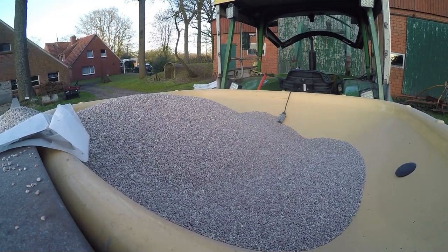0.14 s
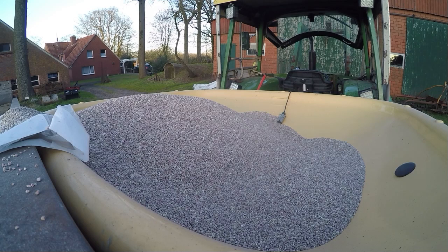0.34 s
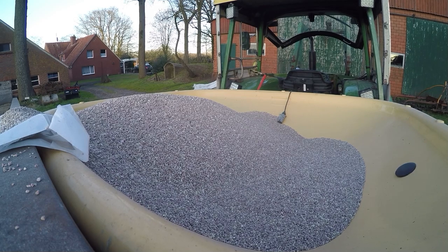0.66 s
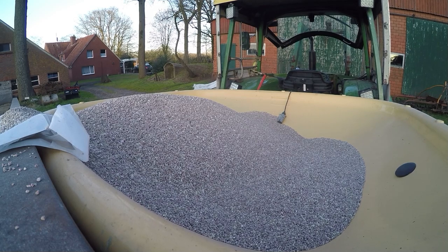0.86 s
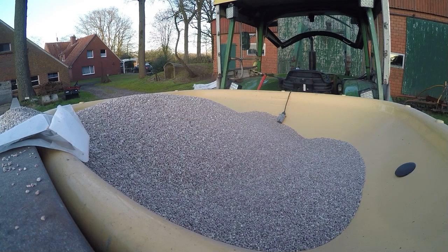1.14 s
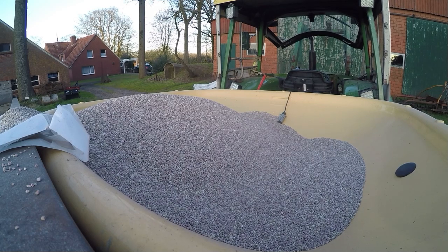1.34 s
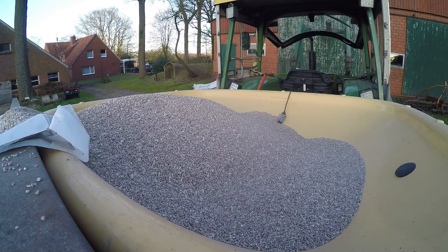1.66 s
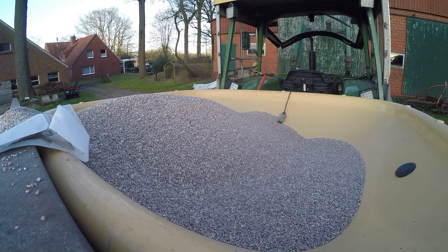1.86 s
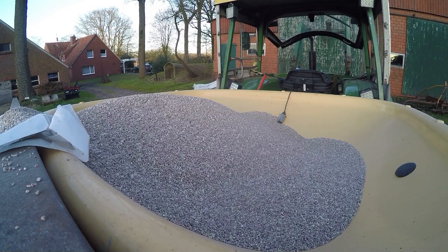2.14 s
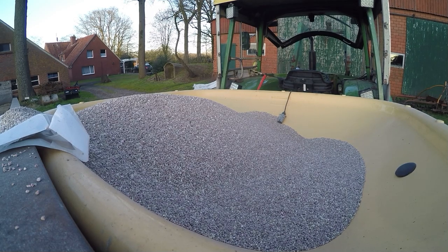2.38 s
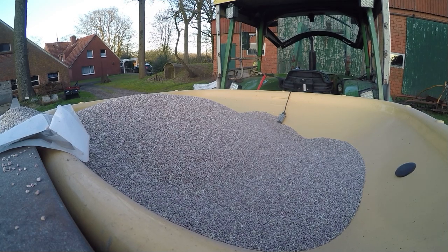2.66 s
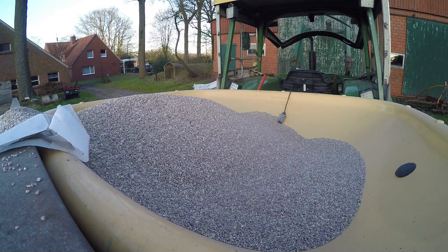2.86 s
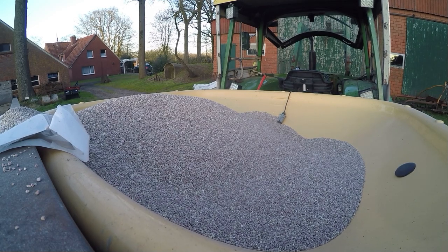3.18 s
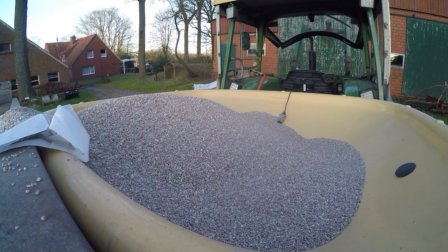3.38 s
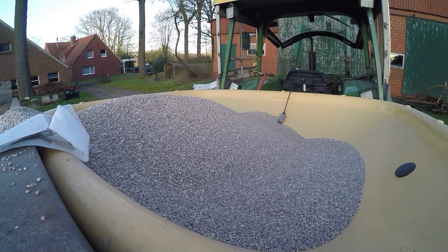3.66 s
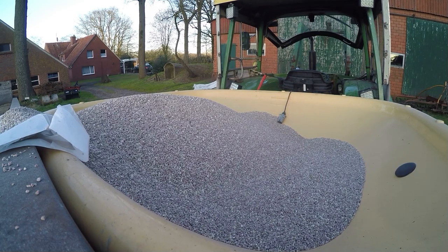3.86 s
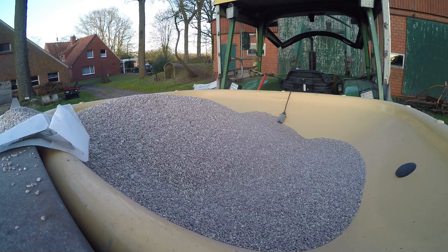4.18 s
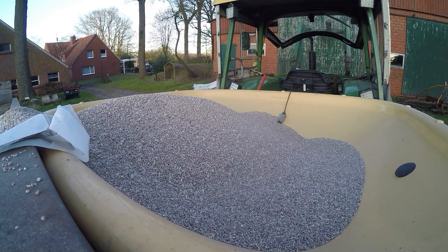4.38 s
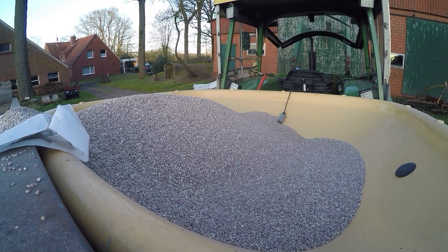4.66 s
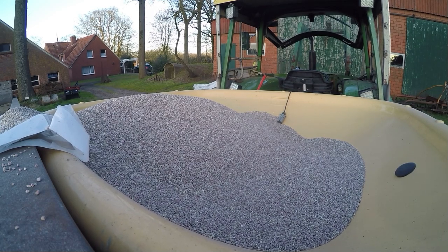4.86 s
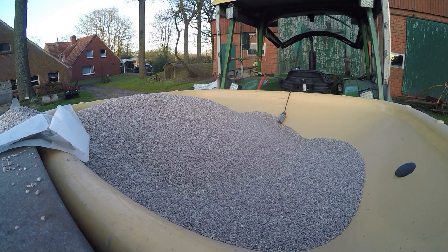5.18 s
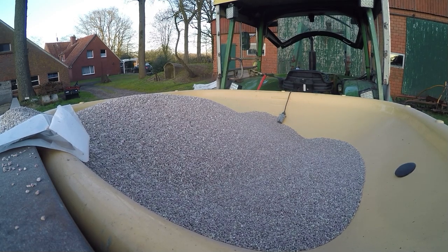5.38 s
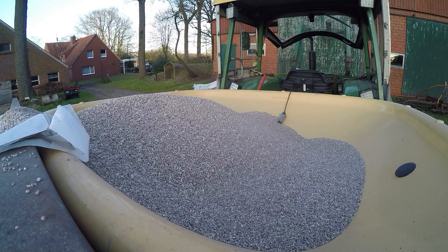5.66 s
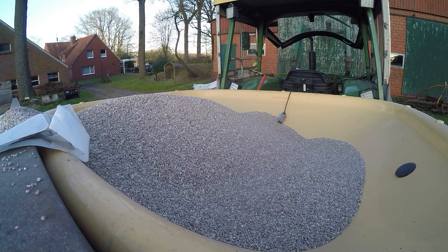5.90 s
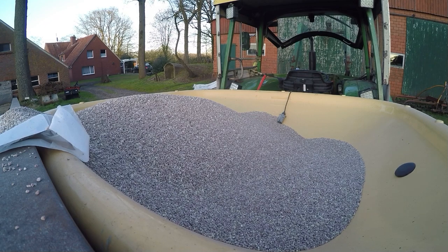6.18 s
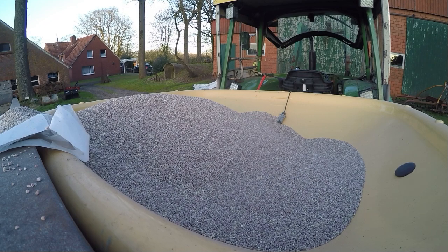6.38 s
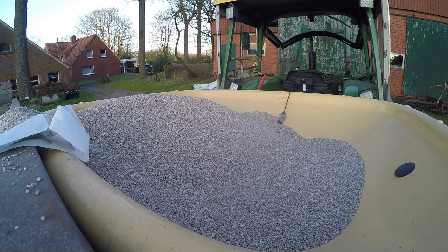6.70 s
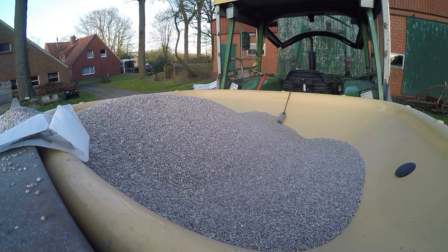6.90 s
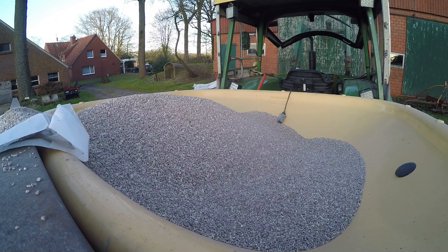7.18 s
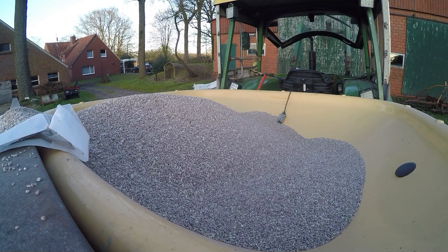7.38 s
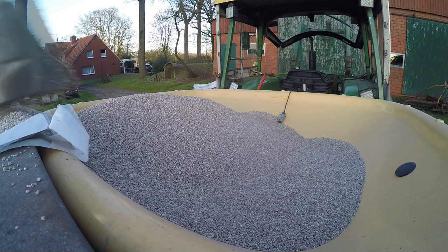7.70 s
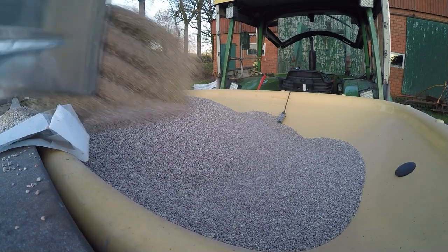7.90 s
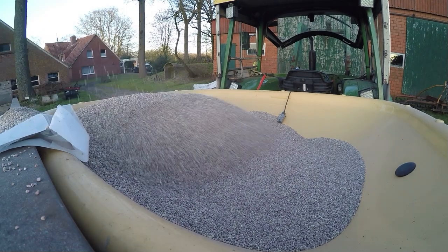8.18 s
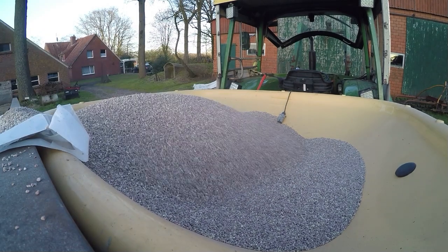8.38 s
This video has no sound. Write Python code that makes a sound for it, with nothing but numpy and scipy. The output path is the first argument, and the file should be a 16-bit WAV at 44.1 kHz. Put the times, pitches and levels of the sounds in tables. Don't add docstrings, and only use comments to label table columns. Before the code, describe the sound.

A metal shovel clanks and crunches hard into a heap of granules again and again, then loads drum and hiss into a plastic hopper.

```python
import sys
import numpy as np
from scipy import signal
from scipy.io import wavfile
from scipy.ndimage import uniform_filter1d

SR = 44100
rng = np.random.default_rng(int(sys.argv[2]) if len(sys.argv) > 2 else 0)


def convert_level_to_amplitude(level_db):
    exponent = np.asarray(level_db, float) / 20
    return 10 ** exponent


def int16_out(signal):
    q = np.round(np.clip(np.atleast_2d(signal).T, -1, 1) * 32767)
    wavfile.write(sys.argv[1], SR, q.astype(np.int16))


N = 377010
TIME_S = np.arange(N) / SR
STEP = 44


def from_db(db):
    return np.exp(db * (np.log(10) / 20))


def per_sample(coarse):
    return np.interp(np.arange(N) / STEP, np.arange(len(coarse)), coarse)


def together(*levels_db):
    return 10 * np.log10(sum(convert_level_to_amplitude(db) ** 2 for db in levels_db))


def swell(s, db, held_s, rise_db_s, fall_db_s):
    t = np.arange(0, N + STEP, STEP)[:, None] / SR
    below_db = rise_db_s * np.maximum(s - t, 0)
    fallen_db = fall_db_s * np.maximum(t - s - held_s, 0)
    each_db = db - below_db * (1 + below_db / 80) - fallen_db
    return 10 * np.log10(np.sum(convert_level_to_amplitude(np.maximum(each_db, -200)) ** 2, axis=1))


def rms_one(x):
    return x / np.sqrt(np.mean(x ** 2) + 1e-20)


def drift(rate_hz):
    r = np.exp(-64 * np.pi * rate_hz / SR)
    noise = rng.standard_normal(N // 32 + 502)
    slow = signal.lfilter([1], [1, -2 * r, r * r], noise)[500:]
    return np.interp(np.arange(N) / 32, np.arange(len(slow)), rms_one(slow))


def strikes(times_s, db):
    clicks = np.zeros(N)
    clicks[np.round(np.asarray(times_s) * SR).astype(int)] = convert_level_to_amplitude(db)
    return clicks


def ring(clicks, hz, t60_s):
    r, w = convert_level_to_amplitude(-60 / (t60_s * SR)), 2 * np.pi * hz / SR
    return signal.lfilter([0, np.sin(w)], [1, -2 * r * np.cos(w), r * r], clicks + 1e-18)


def resonance(x, hz, width_hz):
    r = np.exp(-np.pi * width_hz / SR)
    zeros = np.sqrt((1 - r * r) / 2) * np.array([1, 0, -1])
    return signal.lfilter(zeros, [1, -2 * r * np.cos(2 * np.pi * hz / SR), r * r], x)


def grains(spectrum, per_s, spread_db, clump_db, patchy_db):
    hz_points, db_points = np.transpose(spectrum)
    sizes = convert_level_to_amplitude(spread_db * np.minimum(rng.exponential(1, (2, N)), 5)) * rng.choice([-1, 1], (2, N))
    clicks = sizes * (rng.random((2, N)) < per_s / SR) * convert_level_to_amplitude(clump_db * drift(55.0))
    octaves = np.log2(hz_points[-1] / hz_points[0])
    edges = np.geomspace(hz_points[0], hz_points[-1], int(2.5 * octaves) + 2)
    edges[-1] = min(1.12 * edges[-1], .49 * SR)
    out = 0
    for k, (low, high) in enumerate(zip(edges, edges[1:])):
        band_pass = signal.butter(2, [low, high], "band", fs=SR, output="sos")
        band = signal.sosfilt(band_pass, clicks[k % 2])
        level_db = np.interp(np.log(low * high) / 2, np.log(hz_points), db_points)
        out = out + band * from_db(level_db + patchy_db * np.roll(drift(26.6), k))
    return rms_one(out)


def build_up(gain):
    r = np.exp(-1 / (0.0011 * SR))
    return signal.lfilter([1 - r], [1, -r], gain)


# start in seconds, crunch in dB, decay in dB/s, loose grit minus crunch in dB.
BITES = [(0.082, -15, 378, -11), (0.157, -18, 311.5, -8), (0.633, -45, 600, -30), (0.726, -43.5, 90, -24.5),
         (0.961, -12, 444, -14.5), (1.145, -33.5, 377, -40), (1.209, -20.5, 86, -31),
         (1.21, -33.5, 900, 5.5), (1.268, -32.5, 600, -1.5), (2.208, -18.5, 384, -11.5),
         (2.315, -32.5, 186, -2), (2.546, -34, 153, -10), (3.201, -35, 248.5, -23), (3.403, -40, 600, -26),
         (4.145, -27, 562, -29), (4.219, -9.5, 749, -61), (4.994, -7.5, 628, -14), (5.746, -15, 208, -11.5),
         (5.826, -15, 151, -7), (7.393, -53.5, 97, 9)]
# full at in seconds, crunch in dB, held in seconds, rise in dB/s, fall in dB/s.
PUSHES = [(.0, -52, .03, 500, 150), (0.158, -21, 0.25, 3000, 567), (1.205, -40.5, .004, 450, 300),
          (1.328, -22.5, 0.092, 3000, 86), (1.55, -18.5, 0.13, 78, 703), (2.538, -32, 0.024, 80, 100),
          (2.743, -15, 0.18084, 102, 246), (3.19, -47, 0.0036, 63, 24), (4.134, -48, .01, 101, 300),
          (4.324, -35.5, .01, 172.5, 306), (4.351, -13, 0.17, 903.5, 491.5), (5.09, -13, 0.19, 508, 377.5),
          (5.939, -14, 0.1, 199, 189), (6.097, -22, 0.0082, 69, 424), (6.37, -33, 0.03815, 231, 240),
          (6.698, -50, 0.2, 39, 15)]
# full at in seconds, patter in dB, held in seconds, rise in dB/s, fall in dB/s.
SPILLS = [
    (.45, -34, 0.006, 277, 157),
    (1.055, -53, 0.0061, 74, 500),
    (1.735, -36, 0.066, 300, 105.5),
    (1.935, -43.5, 0.00334, 31, 451.5),
    (3.366, -52, 0.0292, 43, 98.5),
    (3.674, -28, 0.0064, 51, 178),
    (4.58, -29, 0.0026, 190, 212),
    (6.368, -28.5, 0.0065, 238, 214),
]


def effort():
    s, db, fall_db_s, grit_db = np.transpose(BITES)
    push_s, push_db, held_s, rise_db_s, push_fall_db_s = np.transpose(PUSHES)
    bite_hold_s, bite_rise_db_s, rest_db = 0.004, 6998, -67
    spill_db = swell(*np.transpose(SPILLS))
    bite_db = swell(s, db, bite_hold_s, bite_rise_db_s, fall_db_s)
    crunch_db = together(bite_db, swell(*np.transpose(PUSHES)), spill_db - 15.5, rest_db)
    thrown_db = swell(push_s, push_db - 8.5, held_s, rise_db_s, np.minimum(push_fall_db_s, 181))
    loose_db = together(thrown_db, spill_db, rest_db)
    patter_db = together(swell(s, db + grit_db, bite_hold_s, bite_rise_db_s, fall_db_s), loose_db)
    airy_db = 2 * loose_db - patter_db - crunch_db
    return per_sample(crunch_db), per_sample(patter_db - crunch_db), per_sample(airy_db)


# start in seconds, extra level in dB.
JOLTS = [(0.095, 7.5), (0.244, 4), (.262, 8.5), (0.359, 8.5), (0.387, 4), (.755, 2), (1.245, 4),
         (1.267, 1.5), (1.365, -4), (1.396, 8.5), (1.55, 4.5), (1.653, 3), (1.692, 8.5), (2.457, 9.5),
         (2.503, 0), (2.545, 11.5), (2.742, 4.5), (4.301, 8.5), (4.348, 1), (5.172, 3), (5.24, 0),
         (6.67, 10)]
# frequency in Hz, density in dB per Hz.
CRUNCH = [(110, -24), (180, -4.5), (645, -2.5), (704, -2.5), (973, -0.5), (1160, -0.5), (2680, -11.5),
          (3750, -21.5), (6000, -36.5), (7800, -23), (13200, -120)]
# frequency in Hz, density in dB per Hz.
PATTER = [(880, -12), (1500, -12), (2440, -8.5), (2670, -8.5), (3750, -8.5), (4890, -8), (10700, -23.5),
          (15400, -34)]
# full at in seconds, level in dB, held in seconds, rise in dB/s, fall in dB/s.
DUST = [
    (3.74, -40.5, .02, 60.5, 80),
]
# frequency in Hz, width in Hz, level in dB.
LOADED_BLADE = [(225.6, 13, -5), (305, 18, -12.5), (427, 17, -7), (636, 6, -14.5), (756, 24, -14.5),
                (969, 90, -12.5), (1100, 8.38, -41), (1253, 36, -15.5), (1640, 14, -11), (1770, 8.2, -16.5),
                (2200, 130, -12.5), (2716, 120, -9), (2940, 93, -10), (3310, 110, -6), (4037, 77.7, -2.5),
                (4830, 45, -8.5), (5880, 240, -5)]


def shovel():
    crunch_db, patter_db, airy_db = effort()
    s, jolt_db = np.transpose(JOLTS)
    slips = strikes(s, 0) * np.interp(TIME_S, s, jolt_db)
    slip_s = .014
    jolts_db = signal.lfilter([1], [1, -np.exp(-1 / (slip_s * SR))], slips)
    force = convert_level_to_amplitude(crunch_db + jolts_db)
    crunch = grains(CRUNCH, per_s=2000.0, spread_db=1.5, clump_db=2.0, patchy_db=2.0)
    patter = grains(PATTER, per_s=7500.0, spread_db=2.0, clump_db=1.0, patchy_db=2.0)
    fine = signal.sosfilt(signal.butter(2, 8000, "high", fs=SR, output="sos"), patter)
    dull = signal.lfilter([.6], [1, -.4], patter)
    brightness = np.clip(1.0 + airy_db / 22, .15, 1)
    sparkle = fine * convert_level_to_amplitude(0.56 * np.clip(airy_db, -30, 12) - 18.0)
    patter = dull + (patter - dull) * brightness + sparkle
    loose_force = force * convert_level_to_amplitude(patter_db + 0.089 * jolts_db)
    rubbing = build_up(force) * crunch + build_up(loose_force) * patter
    dust = per_sample(convert_level_to_amplitude(swell(*np.transpose(DUST)))) * fine
    loaded = rubbing * convert_level_to_amplitude(-.6 * np.clip(patter_db + 4.5, 0, 15))
    modes = 0
    for hz, width_hz, db in LOADED_BLADE:
        spot_db = 3.3 * drift(7)
        modes = modes + resonance(loaded * from_db(db + spot_db - 22.5), hz, width_hz)
    return 0.67 * rubbing + modes + dust


# start in seconds, clank peak in dB, low pitch in Hz, high pitch in Hz, high cluster in dB.
KNOCKS = [(0.085, -3, 507, 1890, -36), (0.163, -5.5, 401, 1714, -13.5), (0.616, -22, 454, 1843, -46),
          (0.7, -15.5, 237, 2650, -51), (0.962, -5.5, 294.4, 1570, -32), (1.144, -39, 213, 1740, -53),
          (1.213, -14, 1005, 1640, -24), (1.331, -6, 212, 1480, -23), (2.208, -20, 394.9, 1570, -43.5),
          (2.314, -19.5, 248, 1450, -49.5), (2.548, -10.5, 320, 1640, -28), (3.202, -40, 820, 2047, -33),
          (3.395, -29, 452, 1630, -37), (4.146, -24, 288, 1530, -46), (4.221, -8, 433, 2880, -44.5),
          (4.995, -4, 928, 1522, -12), (5.75, -8, 949, 3372, -5), (5.833, -13, 1050, 2500, -11.5)]


def knocks():
    s, clank_db, low_hz, high_hz, high_db = np.transpose(KNOCKS)
    out, t = np.zeros(N), np.arange(4000) / SR
    grit = rng.standard_normal((len(s), len(t)))
    bursts = grit * t / 0.0028 * np.exp(1 - t / 0.0018)
    for k, at in enumerate(np.round((s - .003) * SR).astype(int)):
        cluster = 0
        for ratio, share in [(1, 1), (1.44, .2), (1.74, .15)]:
            cluster = cluster + share * np.sin(2 * np.pi * ratio * high_hz[k] * t)
        cluster *= 0.74 + 3.09 * uniform_filter1d(grit[k], size=40)
        cluster *= (1 - np.exp(-t / 0.0037)) * convert_level_to_amplitude(high_db[k] + 3 - 60 * t / 0.071)
        low_shape = (1 - np.exp(-t / 0.0029)) * convert_level_to_amplitude(5.0 - 60 * t / 0.14)
        low = np.sin(2 * np.pi * low_hz[k] * t) * low_shape
        clank = 0.084 * signal.lfilter([.4], [1, -.6], bursts[k]) + low
        out[at:at + len(t)] += convert_level_to_amplitude(clank_db[k] - 14.5) * clank + cluster
    out = signal.sosfilt(signal.butter(2, 7000, fs=SR, output="sos"), out)
    push = strikes(s, clank_db - 21.5)
    floor = ring(push, 56.3, 0.97) + 1.6 * ring(push, 130.0, 0.16) + 0.49 * ring(push, 250, 0.071)
    return out + floor


# middle
# in seconds, length in seconds, pitch in Hz, level in dB.
SINGS = [(0.095, 0.029, 520.1, -41), (0.183, 0.046, 445, -30), (0.262, 0.05254, 433.7, -22.5),
         (0.375, 0.042, 1056, -21), (0.395, 0.036, 692, -27), (0.976, 0.022, 297.2, -16),
         (1.414, 0.03, 969, -24), (1.542, 0.042, 953, -23.5), (1.632, 0.085, 929, -26.5),
         (1.634, 0.02284, 1654, -24), (1.669, 0.055, 1135, -20), (1.695, 0.03, 308, -20),
         (1.698, 0.033, 695, -19), (2.556, 0.026, 328, -26.5), (2.751, 0.032, 1670, -25),
         (2.779, 0.086, 985.1, -19), (2.875, 0.12, 1048, -23.5), (2.887, 0.1, 387.4, -25),
         (2.93, 0.036, 1292, -26), (4.223, 0.018, 1280, -21.5), (4.35, 0.014, 997, -14.5),
         (4.395, 0.022, 1820, -21), (4.397, 0.088, 410, -23), (4.471, 0.11, 908, -22),
         (4.48, 0.08, 1656, -32), (4.483, 0.03296, 1035, -17), (5.002, 0.017, 919, -19),
         (5.004, 0.021, 325, -14), (5.105, 0.04733, 1523, -22), (5.127, 0.103, 303.5, -23),
         (5.129, 0.0534, 1840, -20.5), (5.138, 0.057, 1055, -25), (5.188, 0.075, 947, -20.5),
         (5.245, 0.072, 1680, -30), (5.26, 0.039, 1012, -18.5), (5.761, 0.028, 1220, -20),
         (5.763, 0.02633, 938, -25), (5.764, 0.033, 284, -23.5), (5.852, 0.04105, 1038, -24.5),
         (5.936, 0.054, 1206, -24), (5.963, 0.044, 297, -20.5), (5.968, 0.13415, 1028, -22.5),
         (6.019, 0.057, 1335, -21.5), (6.027, 0.045, 969, -17.5), (6.028, 0.135, 1002, -20.5),
         (0.167, 0.012, 4300, -21.5), (0.169, 0.022, 2261, -25), (0.365, 0.056, 3381, -32),
              (1.408, 0.025, 2261, -29), (1.561, 0.027, 3056, -24.5), (1.67, 0.024, 2821, -25),
              (1.682, 0.052, 2412, -29), (4.46, 0.109, 2750, -29), (4.477, 0.079, 3354, -30),
              (4.479, 0.025, 5943, -30.5), (4.483, 0.028, 2170, -24), (5.109, 0.057, 2490, -29),
              (5.151, 0.055, 5965, -31), (5.156, 0.11, 4802, -30), (5.178, 0.031, 2627, -29),
              (5.277, 0.019, 2800, -40), (5.754, 0.03, 4809, -26), (5.754, 0.01, 5900, -22.5),
              (5.77, .01, 5900, -32), (5.757, 0.022, 3365, -28), (5.759, 0.019, 2132, -22),
              (5.837, 0.027, 2519, -26.5), (6.007, 0.028, 2326, -28), (6.01, 0.024, 4277, -28),
         (0.749, .05, 242.5, -38.5), (1.534, .05, 920, -34), (1.569, .04, 1480, -23.5),
               (1.272, .01, 5800, -34), (5.812, 0.006, 7500, -35), (2.216, .02, 1203, -30),
               (2.225, .04, 304, -29), (2.238, 0.033, 2840, -41), (2.33, .04, 1075, -34.5),
               (2.339, .06, 249.5, -34.5), (2.36, .025, 2330, -41), (2.47, .04, 1002, -35),
               (2.506, .02, 1750, -37), (3.395, .03, 853, -47), (3.41, .03, 610, -46), (4.0, .05, 264, -57),
               (4.239, .026, 239, -22), (4.315, .03, 980, -35)]


def singing():
    out, rows = np.zeros(N), SINGS
    noise = rng.standard_normal((len(rows), 2, 1200))
    grit = uniform_filter1d(noise, size=30, axis=2) * np.sqrt(30)
    blows_s = np.sort([row[0] for row in KNOCKS + JOLTS])
    for (s, length_s, hz, db), (shake, twist) in zip(rows, grit):
        t = np.arange(round(1.7 * length_s * SR)) / SR
        place = t * SR / 10 * (.5 + hz / 2000)
        rough = 1 + .7 * np.interp(place, np.arange(1200), shake + 1j * twist, period=1200)
        at = round((s - t[-1] / 2) * SR)
        since_s = t + at / SR - blows_s[blows_s < s][-1] + (length_s > .055)
        rough *= np.clip(since_s / .003 + .7, 0, 1)
        tone = np.real(rough * np.exp(2j * np.pi * hz * t))
        out[at:at + len(t)] += convert_level_to_amplitude(db) * np.sin(np.pi * t / t[-1]) * tone
    return out


# frequency in Hz, T60 in seconds.
FREE_BLADE = [(452, .67), (684, .36), (762, .4), (924, .3), (1165, .36), (1545, .35), (1669, .4),
              (2083, .4), (2191, .27), (2290, .35), (2710, .3), (3354, .26), (4786, .3)]
# start in seconds, level in dB, favoured pitch in Hz, spread in octaves.
RELEASES = [(.40, -37, 455, 0.98), (0.618, -55, 450, 0.54), (1.70, -30.5, 689.3, 0.87),
            (1.899, -55, 1330, 0.7), (2.211, -32.5, 600, 0.4), (2.225, -43, 762, 0.046),
            (2.321, -47, 900, 2.6), (2.466, -42, 980, 1.9), (2.548, -34, 900, 1.3), (3.55, -45, 684, 0.059),
            (3.581, -45.5, 1170, 0.87), (3.69, -46, 834.4, 0.28), (3.65, -33.5, 1550, 0.065),
            (3.675, -39, 2710, .1), (3.73, -56, 2510, .5), (3.719, -45, 1100, 0.9),
            (3.755, -49.5, 1669, 0.05), (4.533, -42, 450, 0.63)]


def blade_ring():
    s, db, favoured_hz, octaves = np.transpose(RELEASES)
    out = 0
    for hz, t60_s in FREE_BLADE:
        away = np.log2(hz / favoured_hz) / octaves
        out = out + ring(strikes(s, db - 6 * away ** 2), hz, t60_s)
    return out


# landing in seconds, drumming in dB, spray in dB, spray lag in seconds, pouring time in seconds.
LOADS = [
    (7.602, -29, -25, 0.26, 0.32),
    (8.442, -27, -23, 0.0018, 0.021),
]
# frequency in Hz, density in dB per Hz.
DRUMMING = [(88, -29), (150, -10.5), (394, -5), (446, -4), (1130, 0), (1920, -3), (2600, -5.5),
            (10000, -27.5), (13000, -56), (22000, -120)]
# frequency in Hz, density in dB per Hz.
SPRAY = [(1470, -55.5), (2500, -6), (5280, -6), (7380, -12.5), (13500, -13.5), (15400, -17.5)]


def flings():
    s, db, fine_db, lag_s, pour_s = np.transpose(LOADS)
    landing_db_s = 1598
    rise_db_s, held_s = 23.5 / lag_s, 0.32 * pour_s
    drum_db = together(swell(s, db, pour_s, landing_db_s, 120),
                       swell(s, db - 6, pour_s, landing_db_s, 15))
    spray_db = together(swell(s + lag_s, fine_db, held_s, rise_db_s, 198.5),
                        swell(s + lag_s, fine_db - 13, held_s, rise_db_s, 35))
    landed = np.arange(N) >= (s[0] - .005) * SR
    drum = grains(DRUMMING, per_s=3800.0, spread_db=4.0, clump_db=0.85, patchy_db=2.0)
    spray = grains(SPRAY, per_s=10000.0, spread_db=-1.5, clump_db=1.0, patchy_db=-0.5)
    return landed * (per_sample(convert_level_to_amplitude(drum_db)) * drum + per_sample(convert_level_to_amplitude(spray_db)) * spray)


# start in seconds, peak in dB, pitch in Hz, decay in swings.
THUDS = [(3.137, -28, 71.56, 3.8), (4.373, -2.5, 166.3, 1.7), (5.12, -2, 166, 1.9), (5.17, -4, 180, 1.2),
         (6.832, -19, 57.6, 1.3), (6.831, -40, 900, 2), (6.833, -36, 453, 5), (6.927, -26, 125, 1.8),
         (6.929, -23, 47, 1.4), (7.263, -21, 58, 1.9), (7.293, -18.5, 129, 1.8), (7.393, -16, 72, 1.3)]
# full at in seconds, level in dB, held in seconds, rise in dB/s.
SHAKES = [(.086, -32, 0.3, 453), (.706, -26.5, 0.018, 1499.5), (0.977, -13.5, .002, 1100),
          (1.15, -26.5, 0.0047, 2000), (1.223, -50, .01, 228), (1.36, -14.5, .002, 93),
          (1.7, -21.5, .002, 81), (2.207, -23.5, 0.014, 3000), (2.57, -28, .002, 150),
          (2.87, -10, 0.016, 132), (3.41, -42, .002, 310), (3.55, -41.5, 0.0651, 400),
          (4.24, -31, 0.039, 193), (4.402, -10, 0.064, 227), (4.994, -35, 0.026, 3000),
          (5.12, -15, 0.15, 205), (5.9, -22, 0.15, 122), (6.11, -18, 0.00173, 70),
          (6.438, -45.5, 0.0493, 37), (6.823, -39, 0.11, 3000), (7.294, -31, 0.00236, 420),
          (7.408, -33.5, .002, 454), (7.846, -38.5, 0.095, 55), (8.206, -41, .002, 110),
          (8.55, -47, .01, 56)]
# frequency in Hz, density in dB per Hz.
RUMBLE = [(13, -47), (22, -4), (48, 1.5), (144, 3), (304, -6), (347, -10.5), (462, -13), (500, -2),
          (650, -35), (1100, -120)]


def trailer_floor():
    out, t = np.zeros(N), np.arange(6000) / SR
    for s, db, hz, swings in THUDS:
        at = round(s * SR)
        thud = convert_level_to_amplitude(db - 1.5) * np.sin(2 * np.pi * hz * t) * np.exp(-t * hz / swings)
        sole_slap = convert_level_to_amplitude(db - 15.5) * np.sin(2 * np.pi * 3.6 * hz * t) * np.exp(-t / 0.0074)
        out[at:at + len(t)] += thud + sole_slap
    rumble = grains(RUMBLE, per_s=600.0, spread_db=2.0, clump_db=4.5, patchy_db=4.0)
    shake_db = swell(*np.transpose(SHAKES), fall_db_s=164)
    return out + per_sample(convert_level_to_amplitude(shake_db - 4.5)) * rumble


# start in seconds, peak in dB, pitch in Hz.
TICKS = [(0.0293, -32, 1811), (0.0938, -24, 7000), (.111, -26, 9000), (.599, -40, 3000), (.7442, -41, 6000),
         (0.756, -34, 2610), (0.8175, -39, 2440), (.825, -39, 5000), (.841, -42, 5000), (0.853, -39, 2500),
         (.8585, -31, 4000), (.876, -39, 5000), (.9015, -43, 3020), (.9235, -41, 2260), (.929, -42, 3000),
         (2.11, -41, 3390), (2.1422, -31, 4030), (2.1594, -39, 4500), (3.8021, -22, 4800),
         (3.932, -40, 3500), (3.9785, -35, 5100), (3.996, -42, 5000), (4.0635, -36, 3530),
         (4.905, -39, 2480), (5.6936, -47, 2500), (6.755, -42, 3500), (6.906, -30, 4746),
         (7.074, -34, 3500), (7.1386, -33, 2944), (7.16, -36, 3000), (7.439, -33, 3270),
         (7.5183, -38, 4600), (7.668, -14, 4020), (7.711, -24, 4500), (8.0164, -20, 6000),
         (8.196, -39, 2500), (8.26, -25, 2400), (8.284, -23, 6440), (8.319, -27.5, 2940),
         (8.345, -43, 4000), (8.371, -27, 2513), (8.389, -26, 6000)]
# time in seconds, level in dB.
SETTLING = [
    [(.55, -97), (.8, -57.5), (.95, -89.5), (6.5, -74), (6.7, -57), (7.55, -65), (8.0, -62), (8.4, -47.5),
     (8.55, -30.5)],
]


def ticks():
    out, t = np.zeros(N), np.arange(400) / SR
    for s, db, hz in TICKS:
        at = round(s * SR)
        shape = np.exp(-t * hz / 0.89) * (1 - np.exp(-t * hz / 0.25))
        out[at:at + len(t)] += convert_level_to_amplitude(db + 8.5) * np.sin(2 * np.pi * hz * t) * shape
    spectrum = [(1200, -6), (4000, -1.5), (10000, -14)]   # Hz, dB per Hz
    settling = grains(spectrum, per_s=250, spread_db=3, clump_db=3, patchy_db=3)
    return out + convert_level_to_amplitude(np.interp(TIME_S, *np.transpose(SETTLING[0]))) * settling


def walls(x):
    t, t60_s = np.arange(round(.4 * SR)) / SR, 0.6429
    tail = rng.standard_normal(len(t)) * convert_level_to_amplitude(-60 * t / t60_s) * np.clip((t - .02) / 0.0065, 0, 1)
    tail = signal.lfilter([.4], [1, -.6], tail)
    return signal.fftconvolve(x, tail / np.sqrt(np.sum(tail ** 2)))[:N]


def whistle(s, length_s, hz, db, flutter):
    out, at, t = np.zeros(N), round(s * SR), np.linspace(0, length_s, len(hz))
    shake = flutter[at:at + len(t)]
    gate = np.clip(np.minimum(t, length_s - t) / 0.0055, 0, 1)
    phase = 2 * np.pi * np.cumsum(hz * (1 + 0.0044 * shake)) / SR
    out[at:at + len(t)] = np.sqrt(2) * gate * convert_level_to_amplitude(db + 2.9 * shake) * np.sin(phase)
    return out


# start in seconds, length in seconds, top in Hz, level in dB, loudest point as share of length.
CALLS_UP = [
    (6.674, 0.15, 3340, -56, 0.5407),
    (6.993, 0.15, 3100, -53.5, 0.42),
    (7.313, 0.17, 3230, -55, 0.35),
]
# start in seconds, length in seconds, from in Hz, to in Hz, level in dB.
CHIRPS = [
    (3.93, 0.037, 3900, 3000, -59.5),
    (4.07, .02, 3284, 3880, -57),
    (4.102, 0.0275, 3760, 3133, -59),
    (7.0, 0.026, 4325, 3711, -57),
]


def birds():
    out, flutter = np.zeros(N), drift(52.0)
    from_hz, top_at, droop_hz = 2250, .83, 90
    for s, length_s, top_hz, db, loudest in CALLS_UP:
        share = np.linspace(0, 1, round(length_s * SR))
        past = np.maximum(share - top_at, 0) / (1 - top_at)
        climb = np.minimum(share / top_at, 1) ** .9
        hz = from_hz + (top_hz - from_hz) * climb - droop_hz * past
        ground_echo_db = 3 * np.cos(2 * np.pi * hz / 472)
        call_db = db - 28 * (share - loudest) ** 2 + ground_echo_db
        out += whistle(s, length_s, hz, call_db, flutter)
    for s, length_s, from_hz, to_hz, db in CHIRPS:
        glide_hz = np.linspace(from_hz, to_hz, round(length_s * SR))
        out += whistle(s, length_s, glide_hz, db, flutter)
    return out + convert_level_to_amplitude(-7.5) * walls(out)


# frequency in Hz, density in dB per Hz.
YARD = [(15, -36), (25, 8), (64, 4.5), (368, -20.5), (432, -20), (508, -19), (2760, -26.5), (4860, -28.5),
        (7280, -38), (14300, -37.5), (15400, -47)]


def yard_air():
    return convert_level_to_amplitude(-47) * grains(YARD, per_s=10000.0, spread_db=-1.0, clump_db=-2.5, patchy_db=1.5)


def scene():
    near = shovel() + blade_ring() + knocks() + trailer_floor() + ticks() + flings()
    far = convert_level_to_amplitude(-29.0) * walls(near) + convert_level_to_amplitude(1.5) * birds() + yard_air()
    return (near + far + singing())[None]


def band_limit(x):
    return signal.sosfilt(signal.butter(12, 15600, fs=SR, output="sos"), x)


def record(dry):
    low_cut = signal.butter(2, 35, "high", fs=SR, output="sos")
    top_cut = signal.cheby2(16, 45, 15680, fs=SR, output="sos")
    rounded = 1.18 * np.tanh(signal.sosfilt(low_cut, dry) / 1.415)
    return band_limit(signal.sosfilt(top_cut, rounded))


dry = scene()
out = record(dry)
int16_out(out)
```